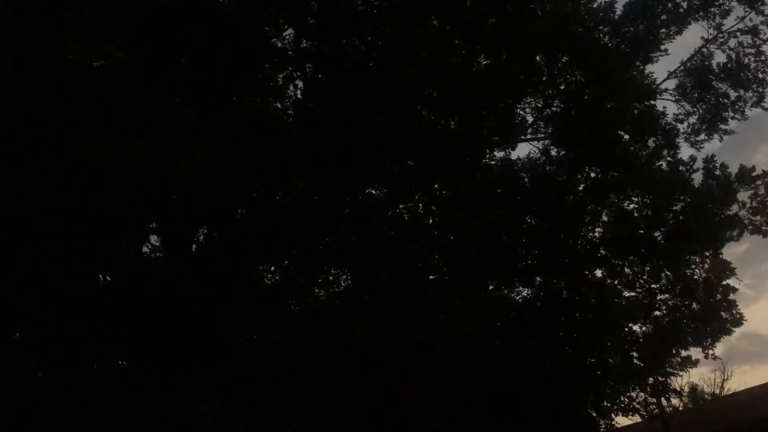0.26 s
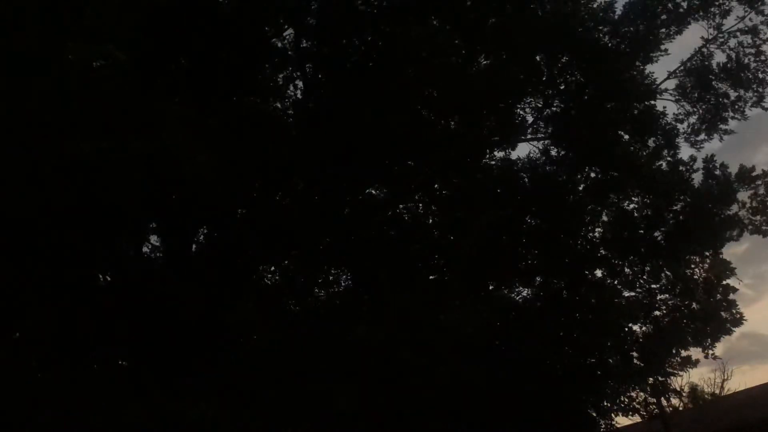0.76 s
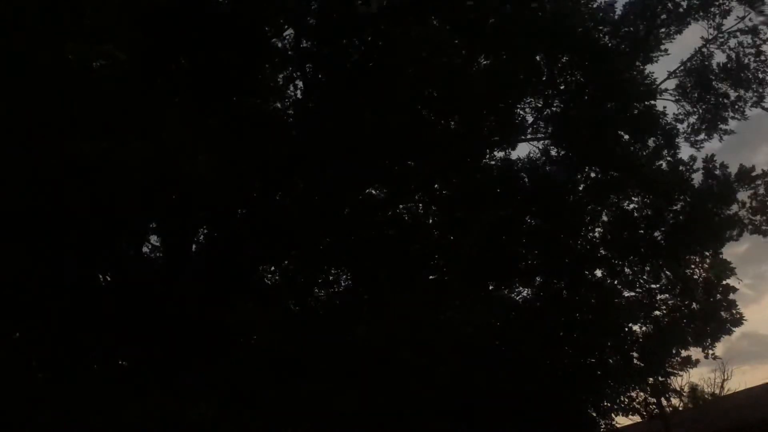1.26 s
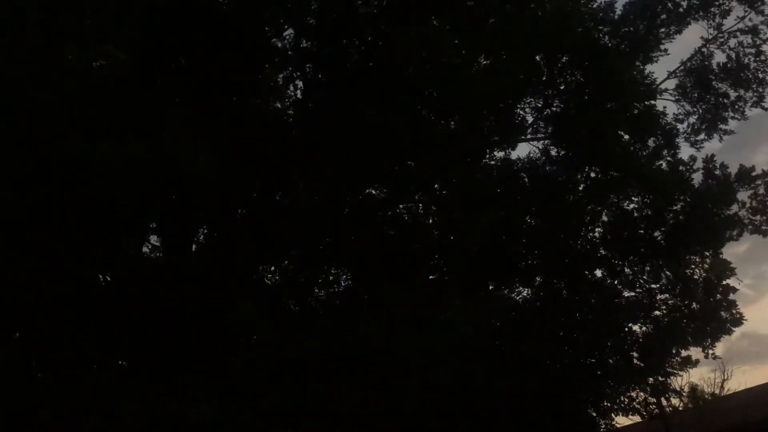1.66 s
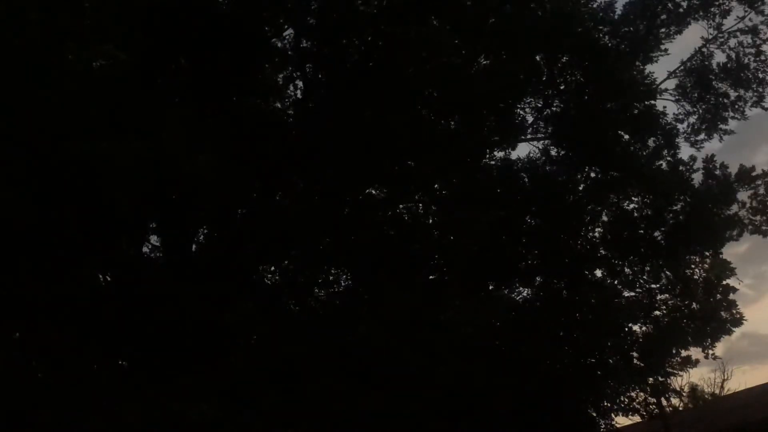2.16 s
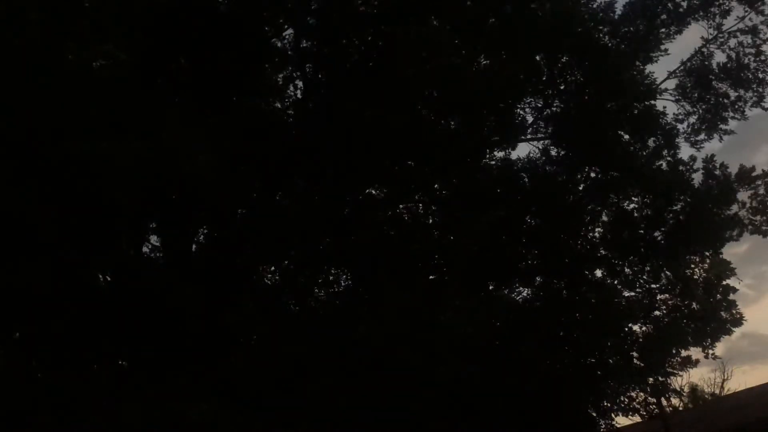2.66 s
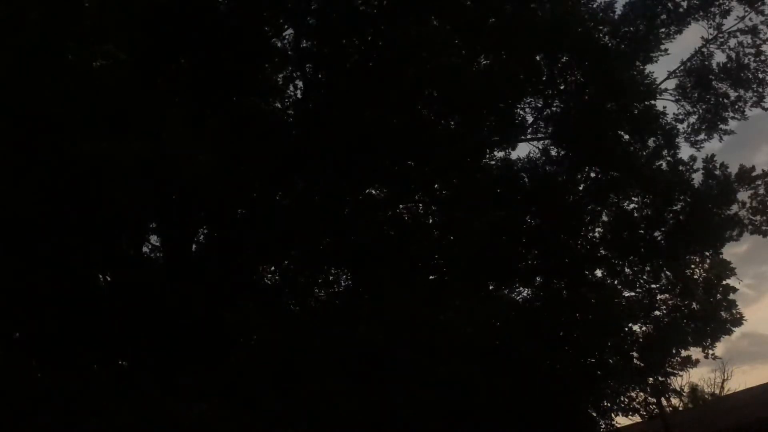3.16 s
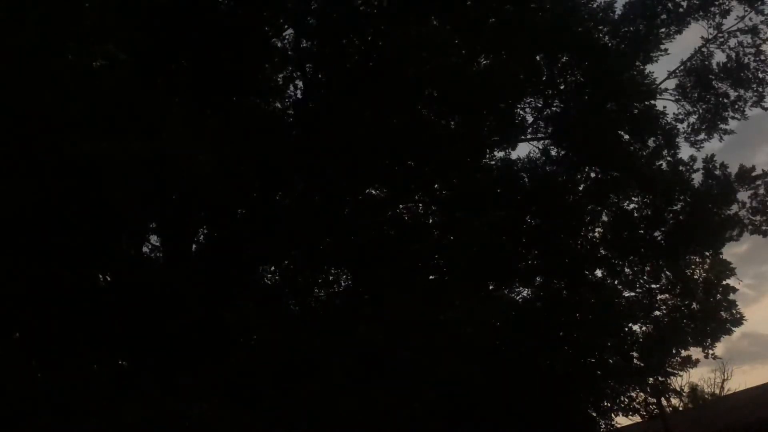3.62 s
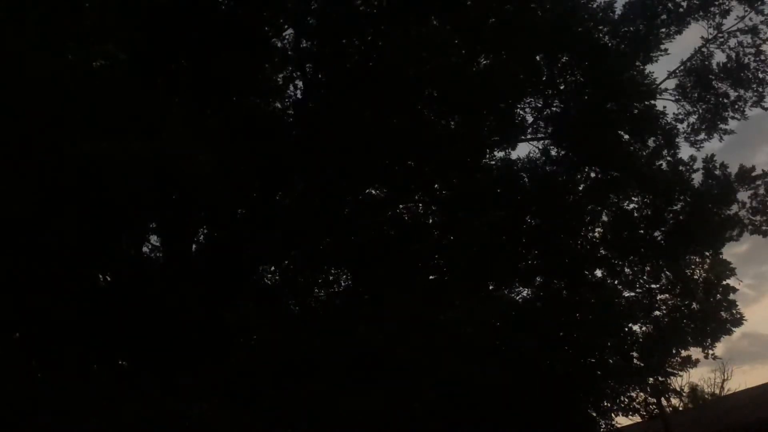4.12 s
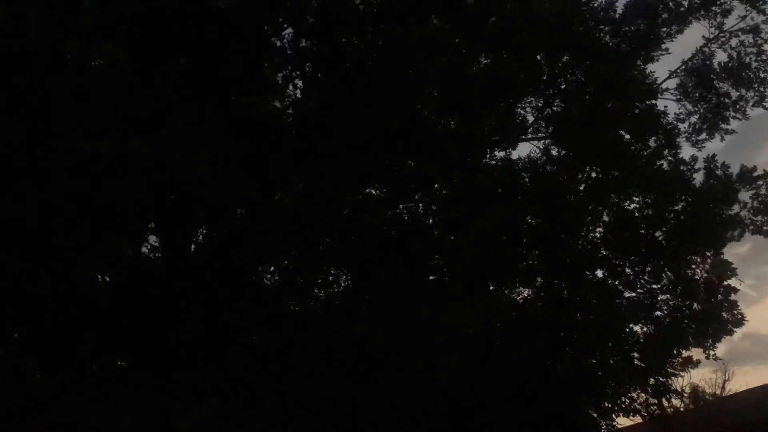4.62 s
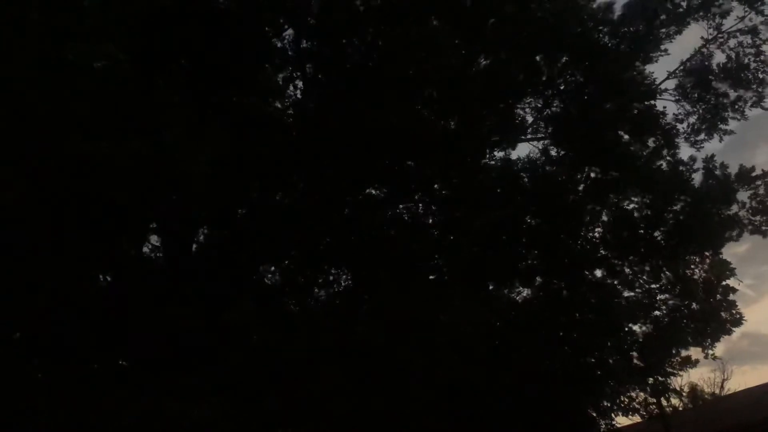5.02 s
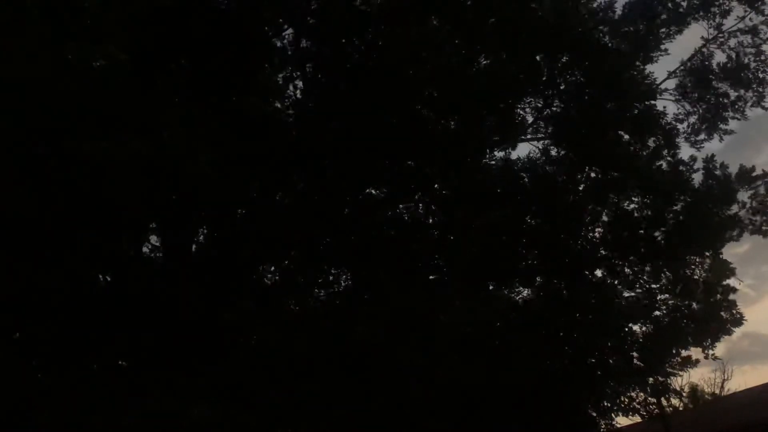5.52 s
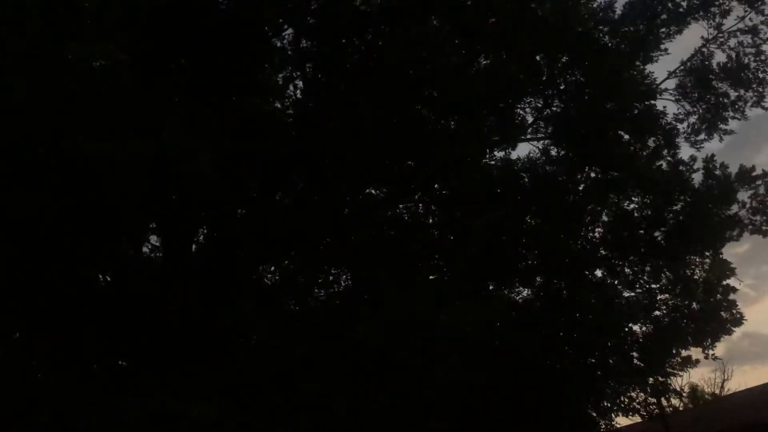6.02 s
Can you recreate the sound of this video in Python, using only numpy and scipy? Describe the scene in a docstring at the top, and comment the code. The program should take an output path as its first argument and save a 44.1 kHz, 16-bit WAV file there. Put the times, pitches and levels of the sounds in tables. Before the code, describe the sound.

A dense dawn chorus of thrush-like whistles, slurs and buzzes overlaps among echoing trees, with tiny high twitters and faint distant traffic hum beneath.

```python
"""Thrush-like birds whistle, slur and buzz over one another: a dawn chorus at the edge of a wood.
Each note is a nearly pure tone on a pitch curve; random echoes from the trees scatter it.
A small bird twitters high up in double pips, and many far birds blur together as faint slurs and noise.
Underneath lie distant traffic (low noise and wandering drones), one brief far rumble and a faint hiss."""
import sys
import numpy as np
from scipy import signal
from scipy.fft import rfft, irfft, next_fast_len
from scipy.io import wavfile
from scipy.ndimage import map_coordinates

SR = 44100
rng = np.random.default_rng(int(sys.argv[2]) if len(sys.argv) > 2 else 0)


def persist_wave(psi):
    """Save psi, clipped to +-1, as 16-bit WAV."""
    counts = np.round(np.clip(psi, -1, 1) * 32767).astype(np.int16)
    wavfile.write(sys.argv[1], SR, np.atleast_2d(counts).T)


N = 276948

# Syllable shapes: pitch ratios at the start, one third, two thirds and the end
ARCH = [.9, 0.98, 0.93, .81]
HOLD = [.935, 1.005, 1.005, .98]
DIP = [1.27, 1.03, .98, 1.12]
SCOOP = [.64, .89, 0.98, 0.97]


def amp(db):
    """Decibels to gain."""
    return 10 ** (np.asarray(db) / 20)


def unit(x):
    """Scale to rms 1."""
    return x / np.sqrt(np.mean(x ** 2) + 1e-20)


def along(points, hz):
    """Read a curve of (Hz, value) points on a log frequency axis."""
    point_hz, values = np.transpose(points)
    return np.interp(np.log(hz + 1), np.log(point_hz + 1), values)


def wobble(rate, size=N):
    """A smooth random curve through `rate` random knots a second."""
    knots = rng.standard_normal(int(size * rate / SR) + 4)
    return map_coordinates(knots, [np.arange(size) * rate / SR])


def filtered(x, response):
    """Shape the spectrum of x by a response of frequency."""
    padded = next_fast_len(N + SR // 2)
    spectrum = rfft(x, padded) * response(np.fft.rfftfreq(padded, 1 / SR))
    return irfft(spectrum, padded)[:N]


def noise(spectrum):
    """Coloured noise of rms 1."""
    return unit(filtered(rng.standard_normal(N), lambda hz: amp(along(spectrum, hz))))


def add(track, s, sound):
    """Mix a sound into a track at s seconds."""
    part = track[max(0, round(s * SR)):][:len(sound)]
    part += sound[:len(part)]


def glide(pitches_hz, length):
    """A smooth pitch curve through evenly spaced points, over length seconds."""
    order = len(pitches_hz) - 1
    curve = np.polyfit(np.linspace(0, 1, order + 1), pitches_hz, order)
    return np.polyval(curve, np.linspace(0, 1, int(length * SR)))


def syrinx(pitch_hz, fade, overtone_db=-31, press_db=5, third_db=-1, rasp=1.0):
    """A nearly pure voice with two raspy overtones; fade is the share of the note spent rising and dying."""
    n = len(pitch_hz)
    phase = 2 * np.pi * np.cumsum(pitch_hz) / SR
    # high notes are pressed harder: the second harmonic grows by press_db a kHz, up to 6 kHz
    press = amp(overtone_db + press_db * (np.minimum(pitch_hz, 6000) - 4500) / 1000)
    # random phase makes the overtones raspy
    second = np.sin(2 * phase + rasp * wobble(1500, n))
    third = np.sin(3 * phase + rasp * wobble(1500, n))
    third = third * (3 * pitch_hz < SR / 2)  # no aliasing
    swell = signal.windows.tukey(n, np.clip(fade, 0, 1))
    return (np.sin(phase) + press * second + amp(overtone_db + third_db) * third) * swell


def whistlers(waver=.013, flutter_db=2.0, deep_db=-57, near_db=-45):
    """Slurred, slightly unsteady whistles, split into birds at the wood's edge and birds deeper in."""
    edge, deep = np.zeros(N), np.zeros(N)
    for s, length, pitches_hz, db, swell_db in [*cheeps(), *phrases(), *syllables()]:
        pitch = glide(pitches_hz, length)
        n = len(pitch)
        growth_db = swell_db * np.clip(np.linspace(-1, 1, n), -.5, .5)
        level_db = db + growth_db + flutter_db * wobble(187, n)
        unsteady_pitch = pitch * (1 + waver * wobble(301.4, n))
        note = amp(level_db) * syrinx(unsteady_pitch, fade=0.13)
        # faint notes come from farther in
        depth = np.interp(db + abs(swell_db) / 2, [deep_db, near_db], [1, 0])
        add(edge, s, (1 - depth) * note)
        add(deep, s, depth * note)
    return edge, deep


def cheeps():
    """A high hook, a steep falling slur and a low afternote: (s, length, pitches, dB, swell dB) of each."""
    # Cheeps, levels ahead of flutter and trees: slur start_s, slur length_s, top pitch_hz,
    # slur level_db, hook lead_s, hook level_db, afternote level_db
    calls = [(0.432, .03, 6640, -49, 0.0087, -70, -57), (1.448, .026, 5320, -41.5, 0.031, -56, -48.5),
             (2.401, .028, 5360, -41, 0.032, -54.5, -50.5), (3.852, .04, 4910, -44, 0.016, -55.5, -65),
             (4.266, .039, 4480, -43, 0.014, -51.5, -63), (4.711, .028, 5520, -44.5, 0.037, -53.5, -49),
             (5.174, .028, 5265, -43, 0.032, -55, -48.5), (5.69, .029, 5300, -40.5, 0.035, -54.5, -52)]
    # Shapes of the three parts: pitch ratios at the start, one third, two thirds and the end
    hook = [.86, 1.02, 1, .97]
    plunge = [1, .86, .76, 0.604]
    droop = [0.99, .79, .65, 0.613]
    hook_ratio = 1.1  # hook pitch over the top of the slur
    after_delay_s, after_length_s, after_top_hz = .055, .028, 3560
    hook_swell_db, slur_swell_db, after_swell_db = -14, 1, -8  # level change, early to late
    for s, length, top_hz, db, lead, hook_db, after_db in calls:
        yield s - lead, lead, hook_ratio * top_hz * np.array(hook), hook_db, hook_swell_db
        yield s, length, top_hz * np.array(plunge), db, slur_swell_db
        yield s + after_delay_s, after_length_s, after_top_hz * np.array(droop), after_db, after_swell_db


def phrases():
    """A two-voiced phrase with the same pitches and timing each time, in the same form as the cheeps."""
    # Notes of the phrase: delay_s, length_s, shape, pitch_hz, level_db ahead of the phrase gain
    notes = [(0, 0.0537, HOLD, 5050, -45), (0.013, 0.043, ARCH, 3945, -45.5),
             (0.065, 0.075, DIP, 3620, -46), (.068, 0.0546, DIP, 1778, -65.5),
             (.127, .07, SCOOP, 3380, -45), (0.198, .037, DIP, 2894, -47)]
    # Each singing: start_s, gain_db
    singings = [(0.807, -1.2), (3.24, -0.7)]
    for s, gain_db in singings:
        for delay, length, shape, hz, db in notes:
            yield s + delay, length, hz * np.array(shape), db + gain_db, 0


def syllables(slur_swell_db=-1.0, arch_swell_db=-3.5, hold_swell_db=-3.5, scoop_swell_db=7.5):
    """Loose slurs, arches, holds, scoops and dips, each a short pitch gesture, in the same form."""
    # Slurs, down or up: start_s, length_s, start pitch_hz, end pitch_hz, level_db
    slurs = [(0.029, 0.04, 4600, 2950, -42), (0.093, 0.008, 3560, 3020, -44),
             (0.268, .06, 4534, 3600, -42.5), (0.339, .035, 4500, 3250, -45),
             (0.386, 0.047, 5630, 6950, -64), (0.398, 0.041, 2394, 3640, -52),
             (0.445, 0.013, 3850, 4860, -41.5), (0.549, .056, 3520, 3136, -46.5),
             (0.671, .022, 2250, 2790, -50.5), (1.197, .11, 4095, 2970, -54),
             (1.802, 0.033, 4700, 5200, -48), (1.889, .022, 2546, 3430, -46.5),
             (1.957, 0.053, 4410, 2760, -42.5), (2.25, .029, 3330, 2815, -55.5),
             (2.539, .021, 2370, 2870, -48.5), (2.842, .015, 4700, 3860, -39.5),
             (2.859, .012, 4140, 6700, -44.5), (2.878, 0.02, 4740, 3420, -41),
             (3.01, 0.094, 3540, 2723, -55), (3.508, 0.076, 3500, 2875, -46.5),
             (3.864, 0.029, 3850, 2730, -47), (3.976, 0.036, 3100, 4030, -47.5),
             (4.003, 0.013, 3530, 2410, -47), (4.029, .014, 3430, 2560, -46),
             (4.085, 0.019, 4580, 2595, -48), (4.118, .013, 4200, 3250, -47), (4.12, .031, 2396, 3090, -48),
             (4.619, .02, 8400, 6300, -63), (4.65, 0.016, 8300, 6400, -64), (5.059, 0.096, 3490, 2900, -52),
             (5.255, 0.023, 3540, 3060, -45.5), (5.733, .019, 2407, 3550, -43.5),
             (5.773, 0.029, 3450, 3440, -46), (5.831, 0.025, 3950, 3220, -51),
             (5.949, 0.05, 4110, 3410, -46), (6.034, 0.024, 4450, 2790, -45.5)]
    # Arched notes: start_s, length_s, crest pitch_hz, level_db
    arches = [(0, 0.026, 3435, -41.5), (0.06, 0.033, 3305, -48.5), (0.508, 0.037, 4250, -44),
              (0.64, 0.048, 3430, -45.5), (1.93, .06, 3540, -47), (2.454, .016, 3186, -43.5),
              (3.585, 0.059, 3570, -51.5), (3.67, 0.048, 3620, -52), (4.733, 0.014, 4090, -42.5),
              (4.875, .062, 3767, -47.5), (4.993, 0.042, 3410, -53), (5.108, 0.049, 4296, -45),
              (5.145, 0.036, 3650, -46), (5.195, 0.024, 4000, -46), (5.29, 0.052, 3650, -44.5),
              (5.582, 0.0453, 3100, -49.5), (5.735, 0.045, 4050, -43.5), (5.815, 0.0248, 4220, -43)]
    # Held whistles: start_s, length_s, pitch_hz, level_db
    holds = [(0.1, 0.059, 4200, -48), (1.3, 0.079, 2980, -57), (1.538, 0.026, 3450, -50.5),
             (1.665, 0.11, 2880, -63), (1.825, 0.0386, 5106, -42), (3.368, 0.065, 5157, -44.5),
             (4.325, 0.1, 2820, -56), (4.538, 0.031, 2920, -48.5), (4.625, 0.052, 2420, -58),
             (4.925, 0.048, 5160, -45.5), (5.478, 0.03, 4730, -46.5), (6.26, 0.025, 4650, -43.5)]
    # Notes that scoop up and level off: start_s, length_s, final pitch_hz, level_db
    scoops = [(0.36, .037, 3580, -52.5), (2.585, 0.072, 3590, -51), (4.565, .055, 3450, -50.5),
              (4.8, .033, 4635, -47), (5.994, 0.04, 4620, -43.5)]
    # Notes that sag and recover: start_s, length_s, trough pitch_hz, level_db
    dips = [(0.555, 0.046, 2365, -56), (2.478, .04, 2200, -61), (5.37, 0.0666, 1600, -73),
            (5.612, 0.043, 2490, -51.5), (5.755, .05, 2150, -64.5)]
    for s, length, start_hz, end_hz, db in slurs:
        yield s, length, [start_hz, np.sqrt(start_hz * end_hz), end_hz], db, slur_swell_db
    families = [(arches, ARCH, arch_swell_db), (holds, HOLD, hold_swell_db),
                (scoops, SCOOP, scoop_swell_db), (dips, DIP, 0)]
    for rows, shape, swell_db in families:
        for s, length, hz, db in rows:
            yield s, length, hz * np.array(shape), db, swell_db


def buzzers(trill_hz=125, rough=0.334):
    """Buzzes, wheezes and sighs: the pitch is shaken up and down too fast to follow."""
    # Buzzy notes: start_s, length_s, pitch_hz, level_db
    buzzes = [(0, 0.023, 4420, -43), (1.852, 0.047, 4300, -46), (2.103, 0.058, 4090, -54.5),
              (2.445, 0.064, 2950, -53), (3.395, 0.1, 4360, -48.5), (3.416, 0.14, 5970, -58),
              (4.11, .053, 4060, -51), (4.322, 0.098, 4760, -60.5), (4.578, 0.099, 7500, -66),
              (4.954, 0.082, 4360, -48.5), (5.295, 0.085, 4760, -50), (5.739, 0.075, 2645, -59)]
    # Long buzzes that climb: start_s, level_db
    wheezes = [(0.611, -54.5), (5.611, -58.5)]
    # Thin calls with a slight tremor, mostly sinking: start_s, start pitch_hz, end pitch_hz, level_db
    sighs = [(1.122, 5500, 4900, -56), (2.962, 4950, 5010, -54), (4.524, 5560, 4900, -57),
             (5.907, 5680, 4890, -57), (6.132, 5500, 4910, -55.5)]
    buzz_swing = 0.1295  # pitch swing as a share of the pitch
    wheeze_s, wheeze_start_hz, wheeze_end_hz, wheeze_swing_hz = .185, 5140, 6660, 546
    sigh_s, sigh_swing_hz = 0.12, 170

    calls = [(s, length, hz, hz, buzz_swing * hz, db) for s, length, hz, db in buzzes]
    calls += [(s, wheeze_s, wheeze_start_hz, wheeze_end_hz, wheeze_swing_hz, db) for s, db in wheezes]
    calls += [(s, sigh_s, start_hz, end_hz, sigh_swing_hz, db) for s, start_hz, end_hz, db in sighs]
    out = np.zeros(N)
    for s, length, start_hz, end_hz, swing_hz, db in calls:
        pitch = glide([start_hz, end_hz], length)
        n = len(pitch)
        shake_rate_hz = trill_hz * (1 + 0.161 * wobble(59.54, n))
        shake = np.sin(2 * np.pi * np.cumsum(shake_rate_hz) / SR)
        shaken_pitch = pitch + swing_hz * (shake + rough * wobble(702.6, n))
        add(out, s, amp(db) * syrinx(shaken_pitch, fade=0.063, overtone_db=-29.0))
    return out


def twitterer(foot_hz=6100, crest_hz=6420, spacing=0.02, db=-64.5):
    """A small bird repeats a pair of high arched pips, each a touch louder or softer."""
    # Double pips: start_s
    pairs = [1.635, 2.01, 2.205, 2.59, 2.775, 3.135, 3.825, 4.21, 4.405]
    out = np.zeros(N)
    for s in pairs:
        for start in (s, s + spacing):
            pip = syrinx(glide([foot_hz, crest_hz, foot_hz], 0.012), fade=0.73)
            add(out, start, amp(db + rng.normal(0, 0.63)) * pip)
    return out


def far_chorus(count=320, chirp_db=-4, blur_db=-4):
    """Many far birds: random slurs heard through the trees, over a noise blur of still farther ones."""
    # Loudness curve of the chorus, ahead of the chirp and blur gains: time_s, level_db
    loudness = [(0, -55), (1.3, -59), (1.7, -61.5), (2.3, -58.5), (2.75, -60), (3.1, -60), (3.8, -62.5),
                (4.4, -58.5), (5.5, -56), (6.2, -61.5)]
    # Colour of the far birds: frequency_hz, relative level_db
    colour = [(1600, -21), (2050, -12.5), (2600, -8), (3300, 0), (4000, -3), (5000, -18.5), (6200, -12),
              (7500, -27), (9000, -39)]
    slurs = np.zeros(N)
    for when, pitch, length, size, steep, way in rng.random((count, 6)):
        sweep = (0.2026 + 0.303 * steep) * np.sign(way - .3)  # most slurs fall
        contour = (2400 + 3400 * pitch ** 2) * np.exp(sweep * np.array([.5, -.1, -.5]))
        slur = syrinx(glide(contour, .02 + .06 * length), fade=0.18)
        add(slurs, when * N / SR, amp(7.8 * size) * slur)
    scattered = trees(slurs, direct_db=-3.5, scatter_db=0.0, tail_db=-8)
    chirps = unit(filtered(scattered, lambda hz: amp(along(colour, hz))))
    level_db = np.interp(np.arange(N) / SR, *np.transpose(loudness))
    return amp(level_db) * (amp(chirp_db) * chirps + amp(blur_db) * noise(colour))


def trees(x, direct_db, scatter_db, tail_db, scatter_t60=0.2, build=0.011):
    """Trunks and leaves scatter a sound at once; the wood answers for longer, its echoes shifting in time."""
    # Ring of the wood: frequency_hz, time to fall 60 dB in s
    wood = [(2000, 0.75), (4000, 0.65), (6500, 0.69), (12000, 0.44)]
    t = np.arange(SR) / SR
    out = amp(direct_db) * x
    hop = SR // 3
    # a fresh random answer every third of a second, crossfaded with its neighbours
    for start in range(0, N + hop, hop):
        hz, age, grain = signal.stft(rng.standard_normal(SR), SR, nperseg=256)
        decay = amp(-60 * age / along(wood, hz)[:, None])
        tail = signal.istft(grain * decay, SR, nperseg=256)[1][:SR]
        tail = tail * (1 - np.exp(-t / build))
        sparse = rng.standard_normal(SR) * (rng.random(SR) < .01)
        scatter = sparse * amp(-60 * t / scatter_t60)
        answer = (amp(tail_db) * unit(tail) + amp(scatter_db) * unit(scatter)) / np.sqrt(SR)
        span = np.arange(max(0, start - hop), min(N, start + hop))
        piece = x[span] * np.cos(np.pi / 2 * (span - start) / hop)
        add(out, span[0] / SR, signal.fftconvolve(piece, answer))
    return out


def traffic(db=-59.5):
    """Far roads: a low rush of noise with a few engine drones wandering in pitch and level."""
    # Colour of the rush: frequency_hz, relative level_db
    rush = [(24, -35), (33, -7), (50, -6), (85, -0.5), (130, 0), (210, -11), (310, -12), (520, -19.5),
            (780, -17.5), (1200, -26), (1700, -28.5), (3000, -44)]
    # Engine drones, middle of their wander: pitch_hz, level_db
    hum = [(86, -69.5), (101, -82.5), (129, -70), (166, -75)]
    drones = np.zeros(N)
    for hz, level_db in hum:
        gain = amp(level_db + 2.4 * wobble(5.0))
        pitch_hz = hz * (1 + 0.0238 * wobble(7))
        drones += gain * np.sin(2 * np.pi * np.cumsum(pitch_hz) / SR)
    return amp(db + 0.67 * wobble(3.835)) * noise(rush) + drones


def rumble(s=2.04, length=0.16, centre_hz=610, width_hz=110, db=-65):
    """A brief hollow rumble far away: noise gathered round one resonance."""
    out = np.zeros(N)
    resonance = lambda hz: 1 / (1 + ((hz - centre_hz) / width_hz) ** 2)
    hollow = unit(filtered(rng.standard_normal(N), resonance))
    n = int(length * SR)
    add(out, s, amp(db) * hollow[:n] * signal.windows.tukey(n, .6))
    return out


def hiss(db=-71.5):
    """Faint steady hiss: coloured noise."""
    # Colour of the hiss: frequency_hz, relative level_db
    air = [(600, -31), (1500, -1), (3000, 1.5), (7000, -7.5), (10000, -20.5), (15500, -18)]
    return amp(db) * noise(air)


def scene():
    """Near and far birds among the trees, over traffic, a rumble and faint hiss."""
    edge, deep = whistlers()
    near = trees(edge, direct_db=-3.0, scatter_db=-3.0, tail_db=-5.5, scatter_t60=0.1)
    deeper = trees(deep, direct_db=0.5, scatter_db=-5.0, tail_db=-0.5, scatter_t60=0.13)
    hidden = trees(buzzers() + twitterer(), direct_db=-7.5, scatter_db=-2.5, tail_db=-5.5, scatter_t60=0.062)
    return near + deeper + hidden + far_chorus() + traffic() + rumble() + hiss()


def record(dry):
    """One channel with nothing kept above a sharp band limit."""
    top_hz = 15750
    return filtered(dry, lambda hz: hz < top_hz)[None]


dry = scene()
out = record(dry)
persist_wave(out)
```